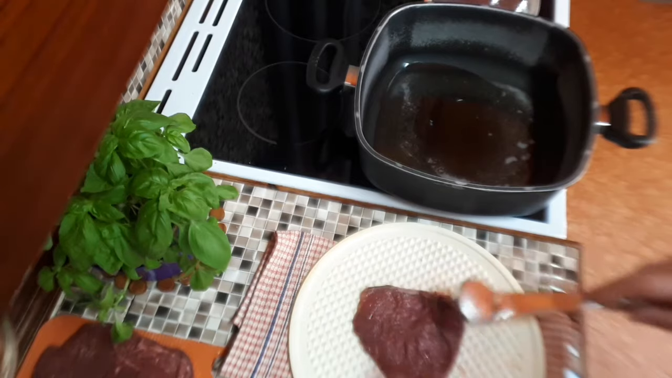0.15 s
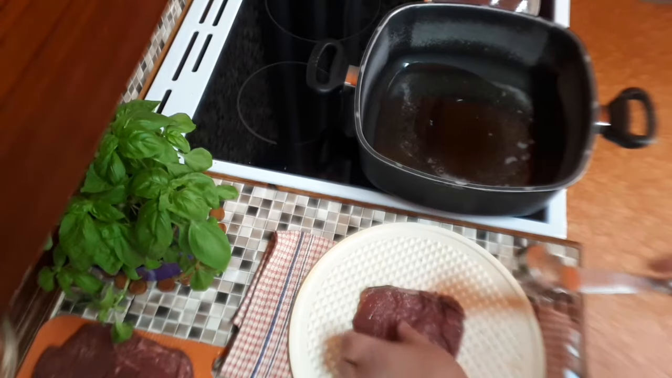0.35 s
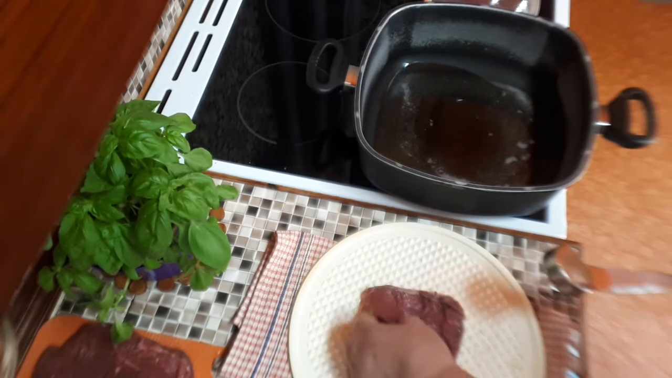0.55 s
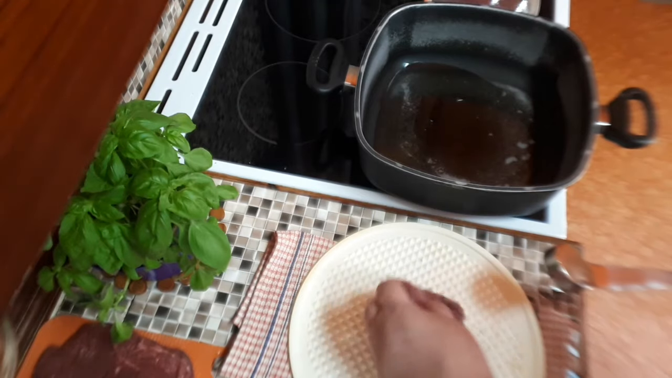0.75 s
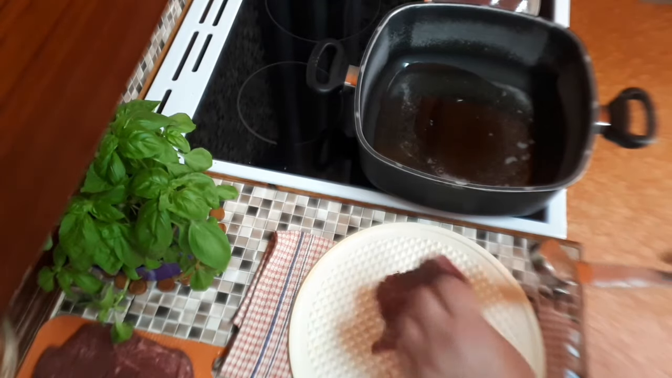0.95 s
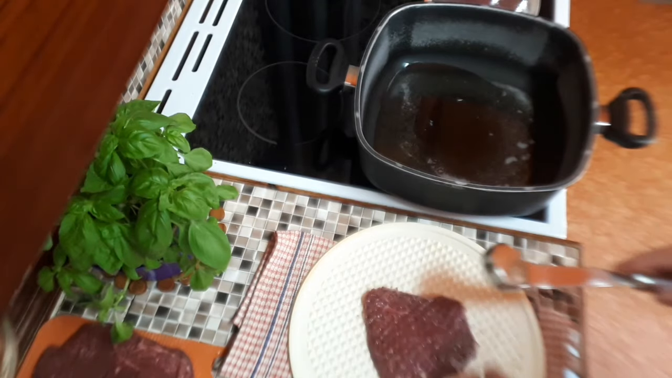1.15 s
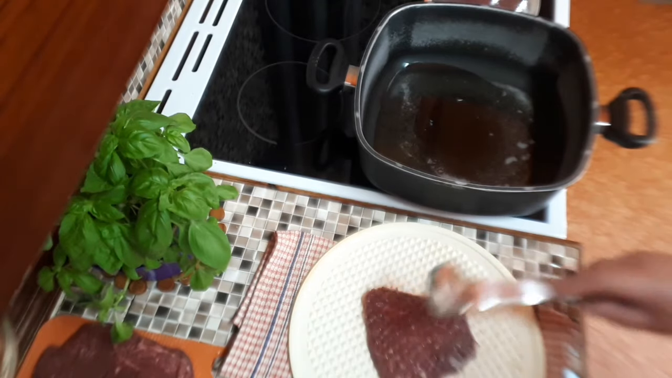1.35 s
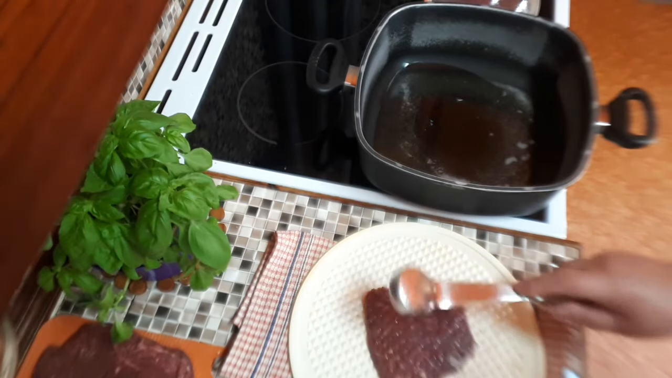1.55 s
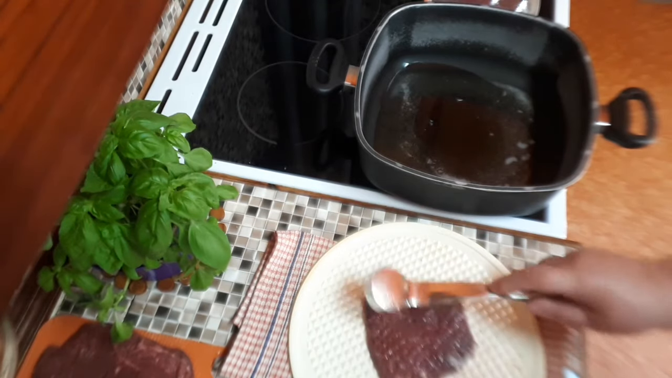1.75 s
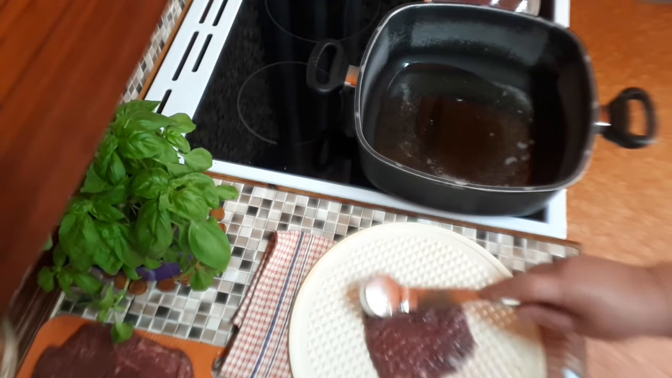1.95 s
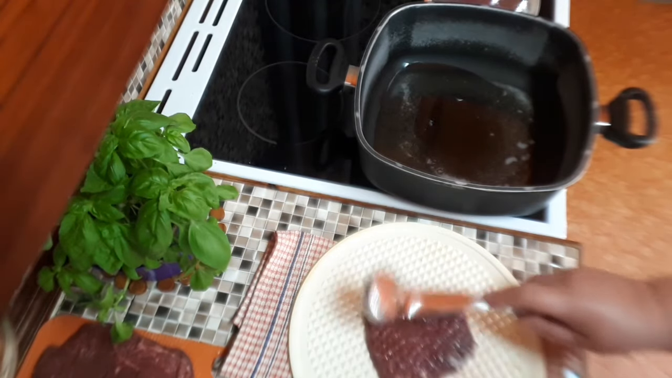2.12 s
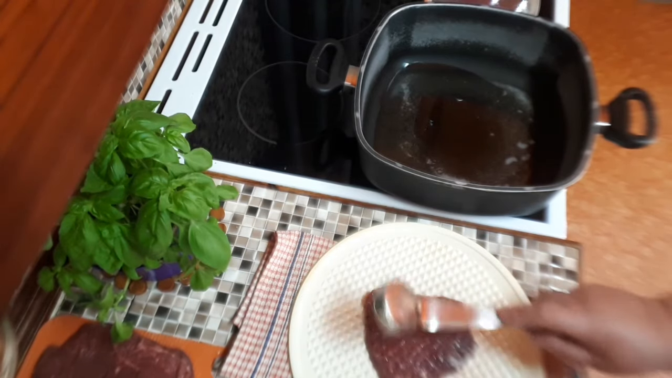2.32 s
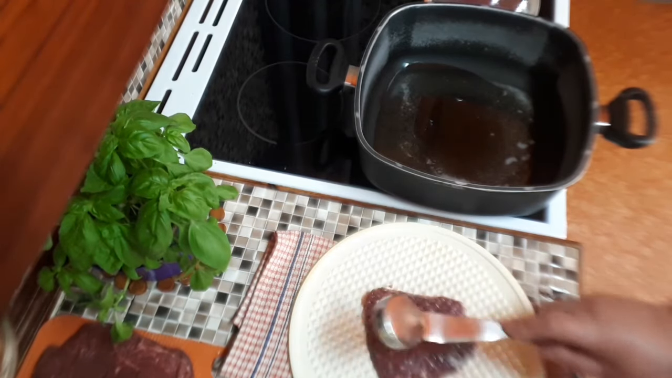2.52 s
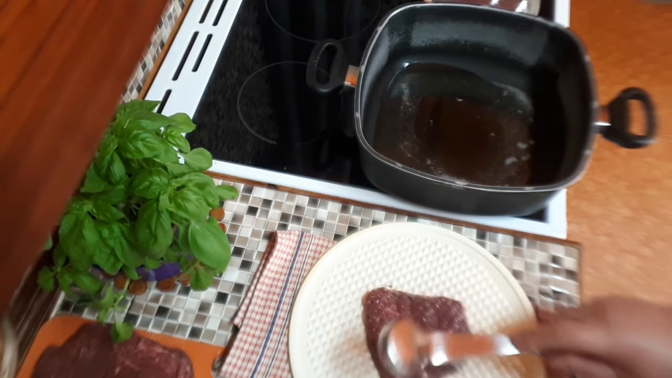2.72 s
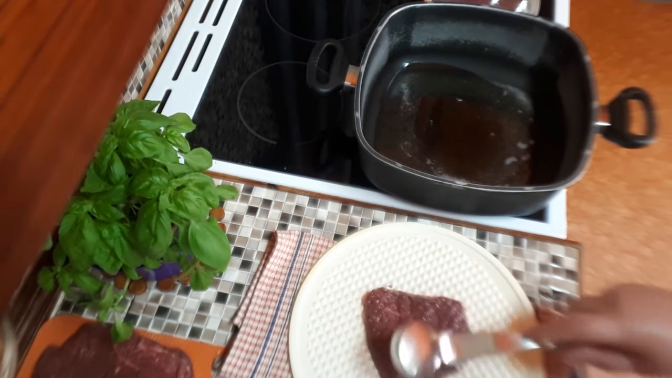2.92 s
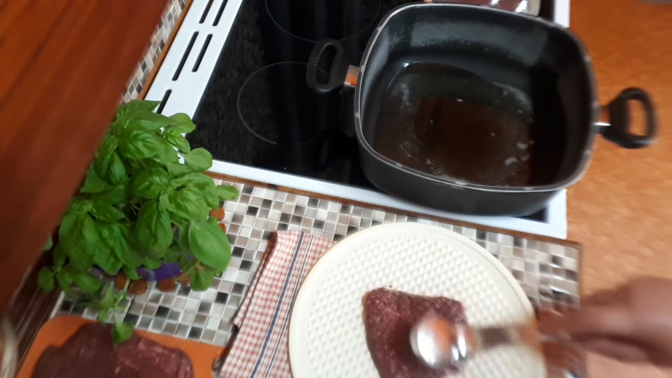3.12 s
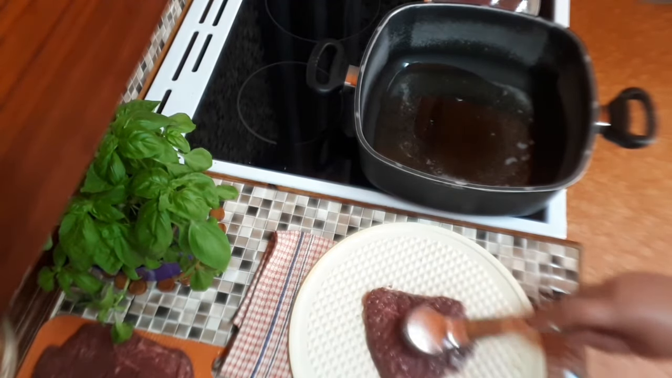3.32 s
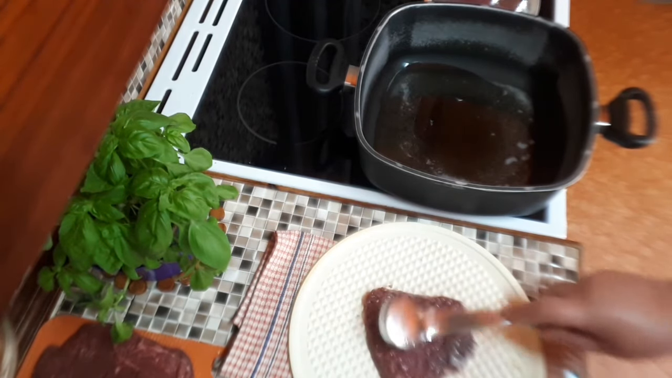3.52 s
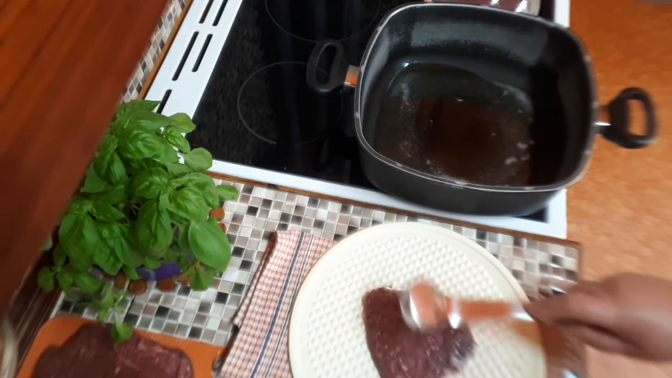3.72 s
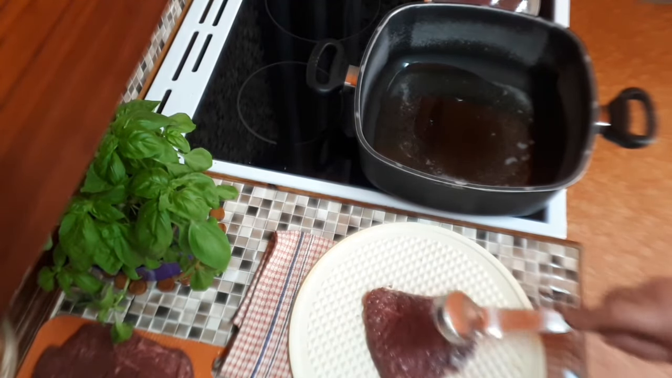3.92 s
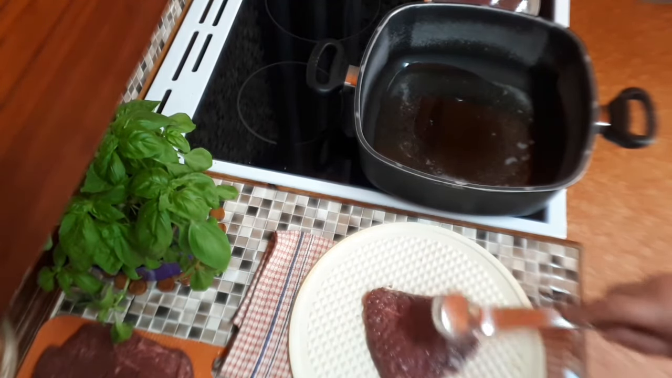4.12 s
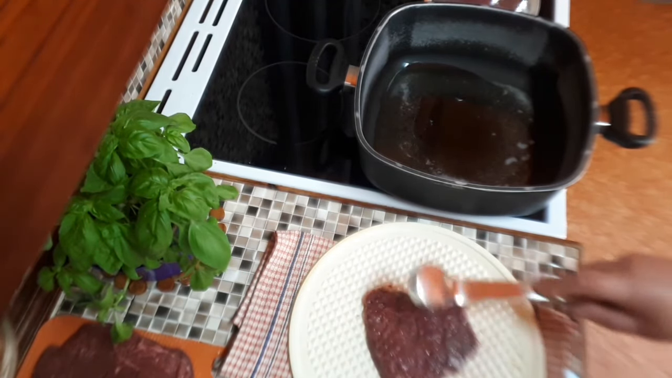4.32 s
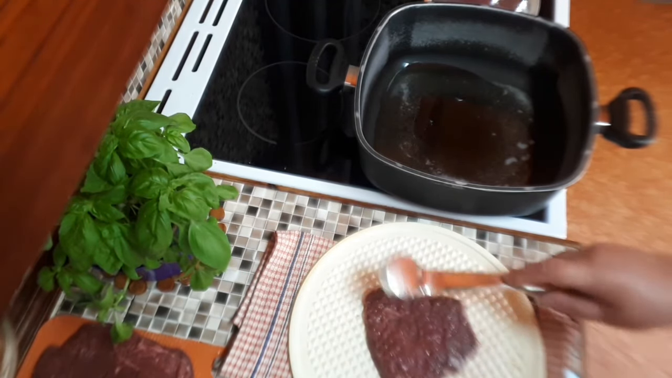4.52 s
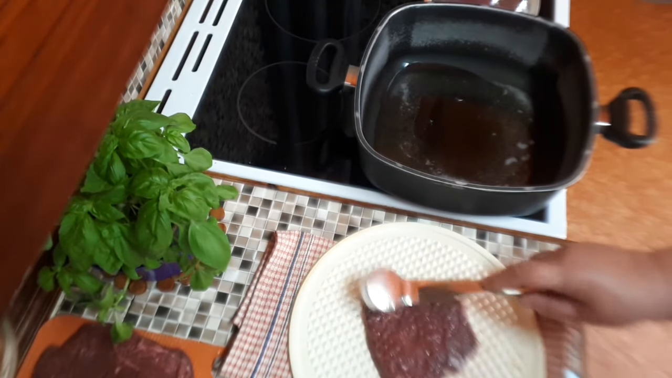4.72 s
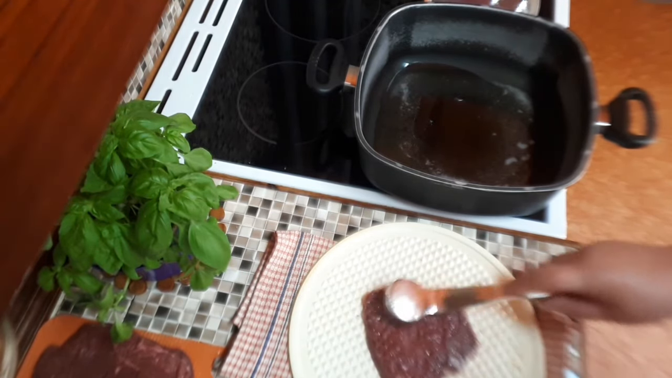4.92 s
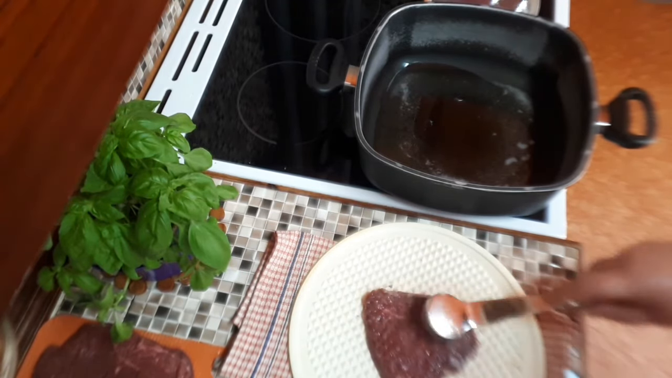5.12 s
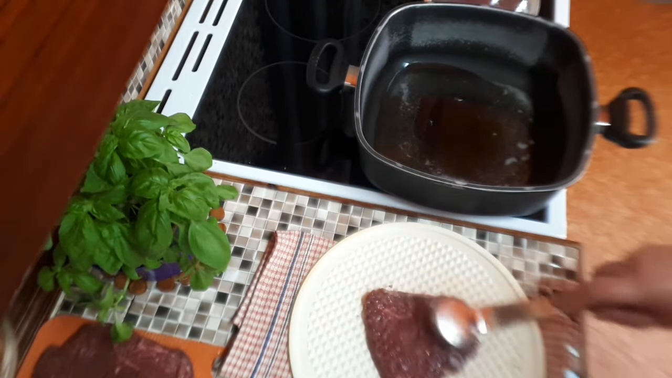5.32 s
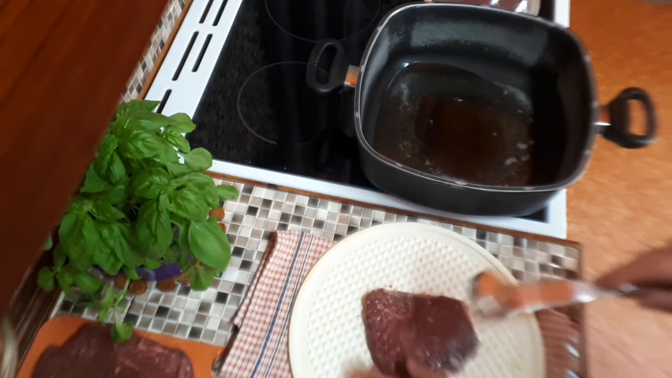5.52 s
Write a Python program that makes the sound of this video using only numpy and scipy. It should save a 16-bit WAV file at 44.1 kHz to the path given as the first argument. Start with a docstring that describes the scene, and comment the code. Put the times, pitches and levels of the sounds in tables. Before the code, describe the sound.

A low thump is dying away at the start, and at once a plate knocks hard on the counter with a quick bounce. From about 0.5 to 1 second, fingers faintly rub and squish a slice of raw beef, which lands on the plate with a smack at 1.1 seconds. From 1.4 seconds a metal mallet pounds the meat evenly, a little over four blows a second, eighteen in all, the last near 5.4 seconds. Each blow is a deep counter thump with a hollow knock, a light plate rattle and a wet slap, followed by small sticky clicks as the meat lets go. Tiny squirts of juice come between 1.7 and 3.1 seconds. At 4 seconds the plate knocks hard again, bright and sharp. The microphone is close, the wet sounds lean right, and the small, hard-walled kitchen adds a short echo over a very faint hush.

```python
"""Pounding beef in a kitchen

Close microphone at the counter of a small, hard-walled kitchen. A metal mallet pounds a slice of beef
on a plate: each blow thumps the counter and slaps the wet meat, which clicks as it lets go of the
mallet. Twice the plate knocks hard. Early on, a hand turns the slice over and drops it back."""
import sys
import numpy as np
from scipy import signal
from scipy.fft import rfft, irfft, next_fast_len
from scipy.io import wavfile
from scipy.ndimage import map_coordinates

SR = 44100
rng = np.random.default_rng(int(sys.argv[2]) if len(sys.argv) > 2 else 0)


def transcribe(u):
    """Save the signal u as a 16-bit wav file named by the first command-line argument.

    u: samples, shape (n,) or (channels, n), limited to [-1, 1]; the rate is SR.
    q: integer samples, one column per channel.
    """
    v = np.clip(np.atleast_2d(u).T, -1, 1)
    q = np.round(v * 32767).astype(np.int16)
    wavfile.write(sys.argv[1], SR, q)


N = 245371
T = np.arange(SR * 3 // 4) / SR  # time within one short sound, in seconds

# Mallet blows, the first already dying away. Each row: start in seconds, thud level in dB,
# knock level in dB, smack level in dB, time the meat clings to the mallet in seconds.
BLOWS = [(-0.3, -8.5, -42, -9, .032), (0.047, -36, -30.5, -23.5, 0.015), (1.44, -27, -30, -48.5, 0.038),
         (1.698, -27, -27, -41, 0.025), (1.928, -25, -26.5, -40.5, 0.034),
         (2.172, -24, -23.5, -36.5, 0.033), (2.402, -23.5, -23.5, -36.5, 0.073),
         (2.634, -26, -23.5, -36.5, 0.059), (2.858, -24, -23, -34.5, 0.035),
         (3.095, -27.5, -27.5, -41.5, 0.035), (3.316, -25.5, -26, -42, 0.034),
         (3.557, -29, -28, -50, 0.034), (3.78, -24.5, -24, -35.5, .034), (4.011, -26.5, -18, -25.5, .033),
         (4.233, -30.5, -29, -50.5, 0.033), (4.45, -27, -22.5, -45.5, 0.032),
         (4.674, -25, -24.5, -36.5, 0.034), (4.903, -26.5, -24, -41.5, 0.032),
         (5.123, -25.5, -21, -42, 0.033), (5.352, -28, -23, -59.5, 0.029)]
# The plate knocks and bounces. Each row: start in seconds, level in dB, contact brightness in Hz.
PLATE_KNOCKS = [(0.0475, -3.5, 4100), (0.0542, -8, 550), (0.0582, -12.5, 548), (4.0143, -8.5, 10700),
                (4.0246, -9.5, 554)]
# Five squirts of juice, then the bright 2.6 kHz bite of the second hard plate knock.
# Each row: start in seconds, pitch in Hz, level in dB.
PITCHED_BURSTS = [(1.7, 6900, -34.5), (1.728, 3550, -44), (1.925, 930, -29), (2.857, 2780, -32),
                  (3.094, 1580, -35), (4.014, 2640, -29)]
# Fingers on the slice. Each row: start in seconds, squish level in dB, rub level in dB.
GRIPS = [(0.551, -44, -62.5), (0.7066, -47.5, -75), (0.7969, -49, -68.5), (0.937, -48, -69),
         (1.039, -45, -64)]

# Low modes set ringing by a blow. Each row: frequency in Hz, level in dB, time to fall 60 dB in seconds.
BOOM_MODES = [(52.2, -57.5, 0.09), (60.9, -34.5, 0.91), (85.55, -20, 0.41), (107.94, -19, 0.35),
              (128.8, -30, 0.66), (141.3, -28.5, 0.58), (177.6, -38.5, 0.52), (219.6, -29.5, 0.16),
              (249.6, -24, 0.16), (297.9, -31.5, 0.24), (366.3, -31, 0.37), (446, -39.5, 0.35)]  # in phase on both sides
ROCKING_MODES = [(144.7, -11.5, 0.17), (173.3, -32, .16), (208.1, -13.5, 0.19), (254, -35.5, .12),
                 (267.5, -11, 0.12)]  # push one side as they pull the other
# Resonances of the plate struck hard. Each row: frequency in Hz, width in Hz, level in dB.
PLATE_MODES = [(260.6, 160, -5.5), (476, 200, -4.5), (707, 220, -15), (972, 53, -4.5), (1208, 210, -3.5),
               (1490, 92, -6), (1630, 42, 0), (2010, 97, -14.5), (2620, 180, -16), (2966, 160, -17),
               (4180, 2500, -18), (7500, 1900, -25)]

# Tone colours at the microphone. Each row: frequency in Hz, spectral level in dB.
HUSH_SPECTRUM = [(30, -17.5), (120, 1), (200, -5), (320, -12), (630, -22), (1000, -8.5), (1250, -12),
                 (1600, -24.5), (2100, -18), (2600, -25), (3400, -18), (4200, -24), (8000, -30),
                 (16000, -30)]  # the still kitchen
SQUISH_SPECTRUM = [(60, -14), (180, 4.5), (300, -17), (650, -14.5), (1000, -7), (1280, 3), (1650, -12.5),
                   (2100, -7), (2600, -13), (3500, -12), (4200, -24), (7500, -23), (9000, -35),
                   (16000, -36)]  # fingers on meat
FLOP_SPECTRUM = [(80, -4.5), (200, -15.5), (400, -7.5), (520, -15), (780, -2.5), (1150, -9.5),
                 (1500, -11.5), (2300, -11), (4000, -18), (6000, -21.5), (7500, -19), (9500, -27),
                 (16000, -26)]  # the slice landing
HOLLOW_SPECTRUM = [(60, -10.5), (130, -25.5), (200, 1.5), (280, 3), (370, -5), (450, -6.5), (600, -20),
                   (1200, -39), (4000, -99.5)]  # the low knock of a blow
CLATTER_SPECTRUM = [(150, -9), (300, 9.5), (450, 0.5), (650, 2.5), (1000, -1), (1400, -3.5), (1750, -5),
                    (2100, -1), (2600, -12.5), (3500, -11.5), (5000, -32.5), (16000, -30.5)]  # the plate smacking and rattling
WET_SPECTRUM = [(400, 0.5), (1500, -12.5), (2800, -3), (3550, 3.5), (4300, -3), (5400, -5.5), (6500, -3.5),
                (7500, 3), (8900, -11.5), (10000, -8.5), (11600, -4.5), (13500, -11), (16000, -14.5)]  # wet slaps and snaps

# The kitchen's reverberation. Each row: frequency in Hz, time to fall 60 dB in seconds.
ROOM_DECAY = [(100, 0.52), (300, 0.4), (1000, 0.53), (3500, 0.5), (7500, 0.37), (14000, 0.36)]
# How alike that tail is on both sides. Each row: frequency in Hz, left-right correlation.
ROOM_LIKENESS = [(100, 1), (500, 0.8), (1200, 0.082), (3000, .05)]

USUAL_THUD_DB, USUAL_KNOCK_DB, USUAL_SMACK_DB = -26, -24, -41.5  # an ordinary blow


def amp(db):
    """Decibels to gain."""
    return 10 ** (np.asarray(db) / 20)


def unit(x):
    """Scale to rms 1."""
    return x / np.sqrt(np.mean(x ** 2) + 1e-20)


def along(points, hz):
    """Read (Hz, value) points on a log frequency axis."""
    f, v = np.transpose(points)
    return np.interp(np.log(hz + 1), np.log(f), v)


def fade(t60):
    """A decay that loses 60 dB in t60 seconds."""
    return np.exp(-np.log(1000) * T / t60)


def swell(rise):
    """A soft start over about rise seconds."""
    return 1 - np.exp(-(T / rise) ** 2)


def add(track, start_s, sound):
    """Mix a stereo sound into the track."""
    start = round(start_s * SR)
    first, last = max(start, 0), min(start + sound.shape[1], N)
    track[:, first:last] += sound[:, first - start:last - start]


def filtered(x, response):
    """Pass x through a complex response, a function of Hz."""
    n = x.shape[-1]
    padded = next_fast_len(n + 8192)
    return irfft(rfft(x, padded) * response(np.fft.rfftfreq(padded, 1 / SR)), padded)[..., :n]


def coloured(x, spectrum, ripple_db):
    """Give x a tone colour, with fresh chance resonances about ripple_db deep."""
    size = 2048
    hz = np.fft.rfftfreq(size, 1 / SR)
    ripple = map_coordinates(rng.standard_normal(size), [np.sqrt(hz) / 2], mode="nearest")
    cepstrum = irfft(np.log(amp(along(spectrum, hz) + ripple_db * ripple)))
    cepstrum[1:size // 2] *= 2  # minimum phase: nothing rings ahead of the contact
    cepstrum[size // 2 + 1:] = 0
    kernel = irfft(np.exp(rfft(cepstrum)))
    kernel /= np.linalg.norm(kernel)
    return np.array([signal.fftconvolve(side, kernel)[:len(side)] for side in x])


def crackle(size, spread_db):
    """Noise made of tiny grains of unequal strength."""
    grain = 32  # samples
    strength = amp(spread_db * np.clip(rng.standard_normal(size // grain + 1), -2, 2))
    return unit(rng.standard_normal(size) * np.repeat(strength, grain)[:size])


def burst(rise, t60, spread_db):
    """A contact: a quickly dying spray of tiny impacts."""
    return crackle(len(T), spread_db) * swell(rise) * fade(t60)


def crack(spray, t60):
    """One sharp contact and a brief spray after it, of energy 1."""
    tail = burst(rise=0.0013, t60=t60, spread_db=2.5)
    sound = signal.unit_impulse(len(T)) + spray * tail / np.linalg.norm(tail)
    return sound / np.linalg.norm(sound)


def room_tone():
    """The faint hush of the kitchen, partly shared by both sides of the microphone."""
    left, right, both = coloured(rng.standard_normal((3, N)), HUSH_SPECTRUM, ripple_db=0.5)
    return amp(-71) * np.array([left + both, right + both])


def room_tail():
    """The hard walls answer in stereo, each frequency dying at its own speed."""
    hz, t, noise = signal.stft(rng.standard_normal((2, len(T))), SR, nperseg=256)
    decay = np.exp(-np.log(1000) * t / along(ROOM_DECAY, hz)[:, None])
    width = np.arccos(np.clip(along(ROOM_LIKENESS, hz), -1, 1))[:, None] / 2
    tail = noise * decay * np.array([np.cos(width), np.sin(width)])
    mid, side = signal.istft(tail, SR, nperseg=256)[1][:, :len(T)] * swell(0.00099)
    return np.array([mid + side, mid - side]) / np.linalg.norm(mid + side)


def placed(x, right_db, room_db):
    """A short sound arrives right_db louder on the right; its energy then spreads through the room."""
    left = np.roll(x, shift=4) * amp(-right_db / 2)
    right = x * amp(right_db / 2)
    direct = np.array([left, right]) / np.sqrt(np.cosh(right_db * np.log(10) / 20))  # constant power
    return direct + amp(room_db) * np.linalg.norm(x) * room_tail()


def turning_slice():
    """Fingers rub and squish under the slice, then it lands flat on the plate with a smack."""
    track = np.zeros((2, N))
    touch = swell(rise=0.025) * fade(t60=0.62)
    for start, squish_db, rub_db in GRIPS:
        rub = [touch * crackle(len(T), spread_db=4) for _ in range(2)]
        add(track, start, amp(rub_db + 5.5) * coloured(rub, SQUISH_SPECTRUM, ripple_db=6))
        squish = placed(crack(spray=2.43, t60=0.052), right_db=17, room_db=2.5)
        add(track, start, amp(squish_db + 10) * coloured(squish, SQUISH_SPECTRUM, ripple_db=6.5))
    landing = placed(crack(spray=1, t60=0.01), right_db=8.5, room_db=-0.04)
    add(track, start_s=1.0782, sound=amp(-1) * coloured(landing, FLOP_SPECTRUM, ripple_db=2))
    return track


def squirts_and_plate_bite():
    """Brief noise at one pitch: juice squeezed through a gap or, last, the bite of a hard plate knock."""
    track = np.zeros((2, N))
    sharpness = 8  # Q of the resonance
    for start, hz, db in PITCHED_BURSTS:
        resonance = lambda f: 1j * f * hz / (sharpness * (hz * hz - f * f) + 1j * f * hz)
        noise = placed(burst(rise=0.001, t60=0.03, spread_db=2), right_db=8, room_db=-2)
        add(track, start, amp(db - 22.5) * unit(filtered(noise, resonance)))
    return track


def unsticking():
    """Wet films snap as the mallet lifts: a clear one, a second close behind, then a stray."""
    track = np.zeros((2, N))
    usual_cling_s, cling_db_per_s = 0.034, -175  # a longer cling lets go more softly
    midway_s, growth_db_per_s = 3.96, 0.5  # the flatter the slice is beaten, the more it sticks
    second_s, stray_within_s = 0.0072, 0.055
    for (start, thud_db, _, _, cling_s), chance in zip(BLOWS, rng.random(len(BLOWS))):
        db = -12.5 + thud_db - USUAL_THUD_DB
        db += cling_db_per_s * (cling_s - usual_cling_s)
        db += growth_db_per_s * (start - midway_s)
        release = start + cling_s + 0.0005
        stray_s = second_s + chance * stray_within_s
        for delay, softer_db in [(0, 0), (second_s, -7.5), (stray_s, -11)]:
            snap = placed(crack(spray=2.3, t60=0.01), right_db=11, room_db=-3)
            add(track, release + delay, amp(db + softer_db) * coloured(snap, WET_SPECTRUM, ripple_db=5))
    return track


def plate_response(f):
    """The plate's heavily damped resonances, alternating in sign, at f Hz."""
    return sum((-1) ** k * amp(db) * 1j * f * width / (hz * hz - f * f + 1j * f * width)
               for k, (hz, width, db) in enumerate(PLATE_MODES))


def plate_knocks():
    """The plate hits the counter hard and fills the room; its softer bounces are duller."""
    track = np.zeros((2, N))
    contact = signal.unit_impulse(len(T))
    for start, db, bright_hz in PLATE_KNOCKS:
        response = lambda f: plate_response(f) / (1 + 1j * f / bright_hz) ** 2
        peak = np.abs(filtered(contact, response)).max()
        knock = filtered(placed(contact, right_db=3.5, room_db=-5.5), response)
        add(track, start, amp(db) / peak * knock)
    return track


def ring(modes, thud_db, knock_db, scatter_db, detune, lag_s):
    """Low modes follow a blow's weight and lag in phase; higher ones, its hardness and where it lands."""
    sound = np.zeros(len(T))
    for (hz, db, t60), (level_draw, pitch_draw) in zip(modes, rng.standard_normal((len(modes), 2))):
        high = np.clip(np.log2(hz / 120), 0, 1)  # 0 below 120 Hz, 1 from an octave above
        variation = (1 + 2 * high) / 3
        level_db = db + thud_db + high * (knock_db - thud_db) + scatter_db * variation * level_draw
        pitch = hz * (1 + detune * variation * pitch_draw)
        sound += amp(level_db) * fade(t60) * np.sin(2 * np.pi * pitch * (T - lag_s * (1 - high)))
    return sound


def counter_thump(thud_db, knock_db):
    """Cushioned by the meat, a blow sets the counter booming, while other low tones rock from side to side."""
    boom = ring(BOOM_MODES, thud_db, knock_db, scatter_db=4, detune=0.018, lag_s=0.0123)
    boom *= amp(22) * swell(0.0057)
    rock = ring(ROCKING_MODES, thud_db, knock_db, scatter_db=2, detune=0.022, lag_s=0.0081)
    rock *= amp(23.5) * swell(0.015)
    return np.array([boom * amp(1.3) + rock, boom * amp(3) - rock])


def mallet_blows():
    """Each blow, close up: a thump, a hollow knock, a smack, the plate settling and a wet slap."""
    track = np.zeros((2, N))
    for start, thud_db, knock_db, smack_db, _ in BLOWS:
        add(track, start, counter_thump(thud_db, knock_db))
        hollow = placed(burst(rise=0.0016, t60=0.084, spread_db=1.5), right_db=6, room_db=0.5)
        add(track, start, amp(knock_db + 3.5) * coloured(hollow, HOLLOW_SPECTRUM, ripple_db=0.5))
        smack = placed(crack(spray=0.9, t60=0.018), right_db=-1, room_db=-1)
        smack = coloured(smack, CLATTER_SPECTRUM, ripple_db=5.5)
        add(track, start + 0.0005, amp(smack_db + 29.5) * smack)
        # harder blows rattle the plate more
        rattle_db = -30 + 0.79 * (knock_db - USUAL_KNOCK_DB) + 0.29 * (smack_db - USUAL_SMACK_DB)
        rattle = placed(burst(rise=0.0066, t60=0.08, spread_db=4.5), right_db=-8.5, room_db=5)
        add(track, start + 0.011, amp(rattle_db) * coloured(rattle, CLATTER_SPECTRUM, ripple_db=2.5))
        # heavier blows press out more juice
        slap_db = -35.5 + 1.3 * (thud_db - USUAL_THUD_DB)
        slap = placed(burst(rise=0.00098, t60=0.093, spread_db=2), right_db=45.5, room_db=-0.5)
        add(track, start - 0.0015, amp(slap_db) * coloured(slap, WET_SPECTRUM, ripple_db=2))
    return track


def scene():
    """All that reaches the microphone at the counter, eased in over 3 ms."""
    ease_in = np.minimum(np.arange(N) / (0.003 * SR), 1)
    pounding = mallet_blows() + unsticking() + squirts_and_plate_bite() + plate_knocks()
    return ease_in * (pounding + turning_slice() + room_tone())


def record(dry):
    """The recorder sheds the deepest bass and keeps nothing above its band limit."""
    bass_hz, top_hz = 42, 16000
    thin = filtered(dry, lambda hz: (hz / bass_hz) ** 4 / np.sqrt(1 + (hz / bass_hz) ** 8))
    return filtered(thin, lambda hz: 1 / np.sqrt(1 + (hz / top_hz) ** 160))


dry = scene()
out = record(dry)
transcribe(out)
```